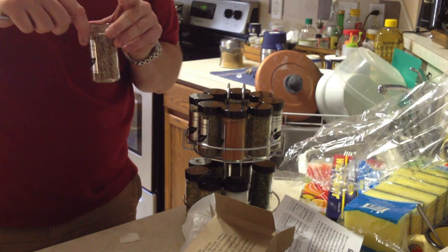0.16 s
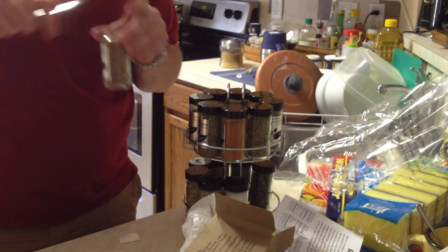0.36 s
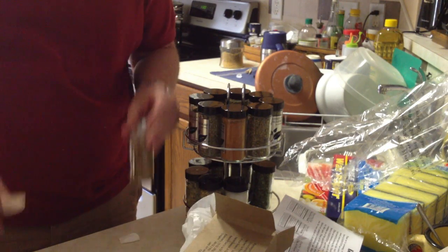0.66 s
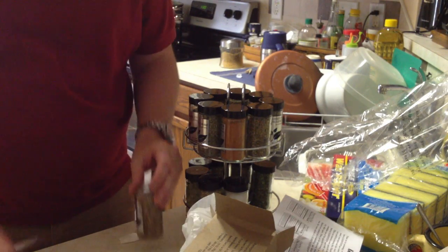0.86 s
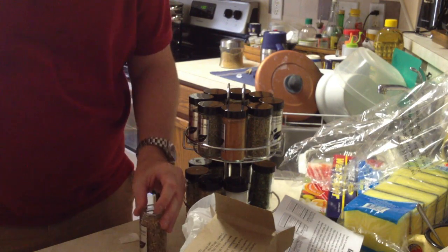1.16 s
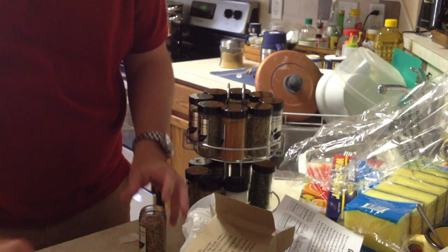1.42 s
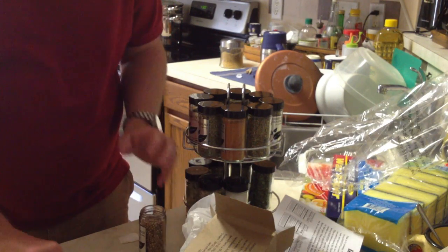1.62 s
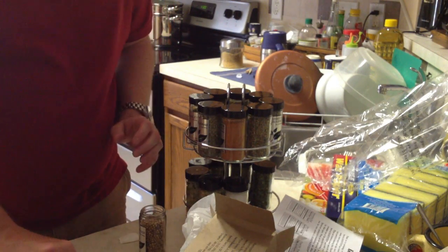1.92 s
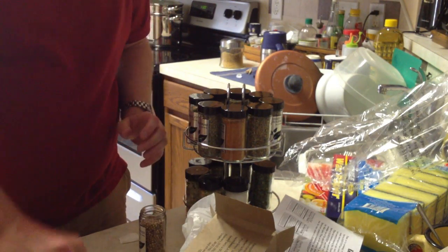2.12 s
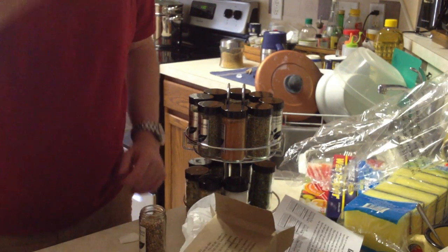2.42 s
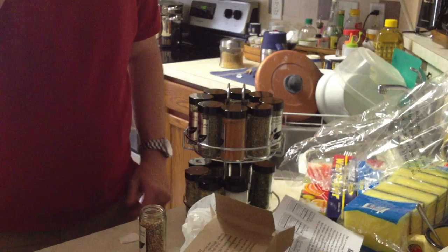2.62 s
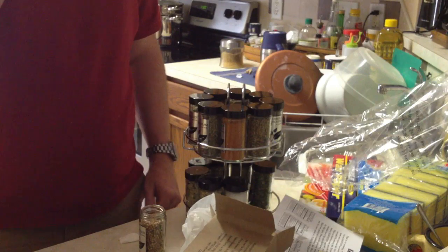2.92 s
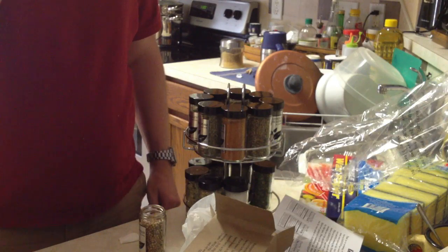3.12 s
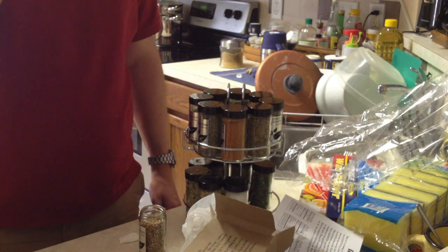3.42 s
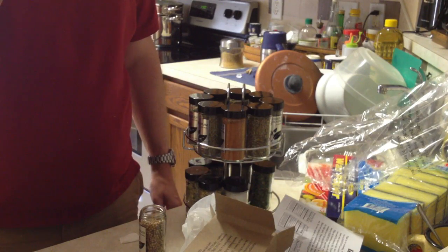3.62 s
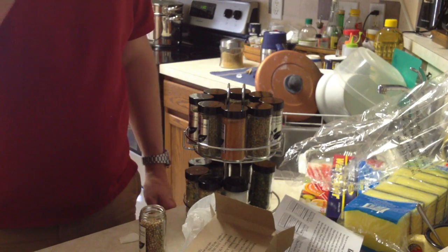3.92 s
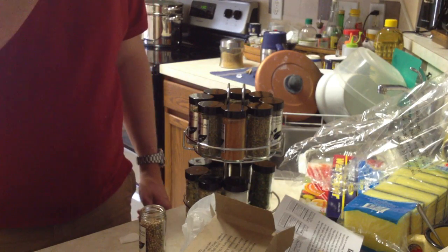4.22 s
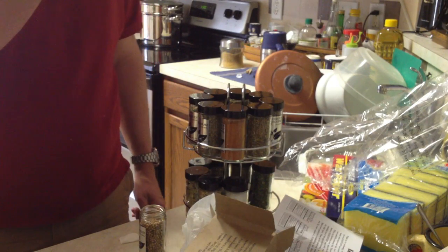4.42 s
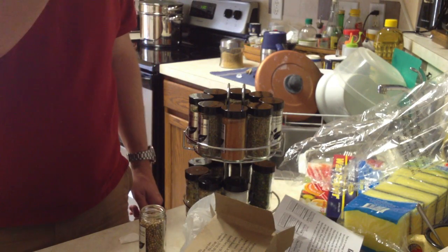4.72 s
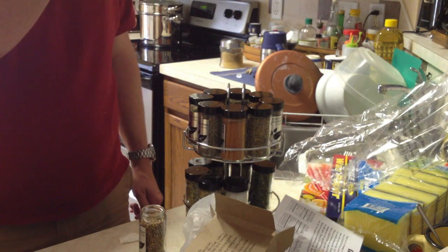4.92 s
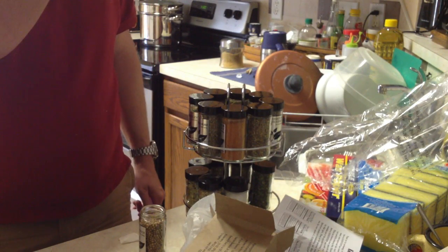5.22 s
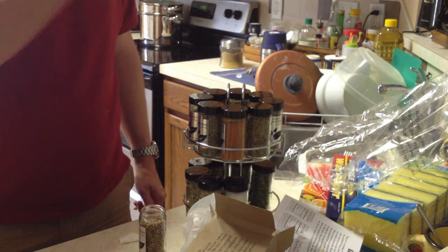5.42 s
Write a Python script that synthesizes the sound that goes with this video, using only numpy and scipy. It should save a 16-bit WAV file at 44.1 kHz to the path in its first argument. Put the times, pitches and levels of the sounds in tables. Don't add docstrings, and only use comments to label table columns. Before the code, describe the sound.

Close to a kitchen counter, a small camera microphone picks up faint ribbed clicks of a jar cap. A full glass jar then thuds down in a quick cluster of knocks, rocks, and clinks on other glass, leaving a high shimmering ring. After a pause, lids are tapped brightly and small dry ticks follow, over low refrigerator hum and hiss in a lively hard room.

```python
import sys
import numpy as np
from scipy import signal
from scipy.fft import rfft, irfft
from scipy.io import wavfile
from scipy.ndimage import uniform_filter1d

SR = 44100
rng = np.random.default_rng(int(sys.argv[2]) if len(sys.argv) > 2 else 0)


def unload_audio(sound):
    columns = np.transpose(np.atleast_2d(sound))
    steps = np.round(np.clip(columns, -1, 1) * 32767)
    wavfile.write(sys.argv[1], SR, steps.astype(np.int16))


def volts(x):
    e = np.asarray(x, float) / 20
    return 10 ** e


N = 245195
WALL_SHARE = 0.76


def evened(x):
    return x / np.sqrt(np.mean(x ** 2) + 1e-20)


def read(points, hz):
    f, value = np.transpose(points)
    return np.interp(np.log(hz + 1), np.log(f + 1), value)


def add(mix, s, sound):
    part = mix[round(s * SR):][:len(sound)]
    part += sound[:len(part)]


def ring(hz, t60, size=8000, rise=.00005):
    t = np.arange(size) / SR
    decay = volts(-60 * t / max(t60, 1e-4))
    onset = (1 - np.exp(-t / rise)) ** 2
    return decay * onset * np.sin(2 * np.pi * hz * t)


def causal(points, size=4096):
    log_gain = np.log(volts(read(points, abs(np.fft.fftfreq(size, 1 / SR)))))
    return np.fft.ifft(np.exp(np.conj(signal.hilbert(log_gain)))).real[:size // 2]


def kitchen():
    # line in Hz, level in dB rms
    hum_lines = [(60, -100.5), (100, -93.5), (120.5, -71), (198, -81), (240, -79.5), (296, -82),
                 (360, -83.5), (576, -99)]
    # frequency in Hz, hiss density in dB per Hz
    hiss_colour = [(30, -26), (60, -22.5), (95, -11), (170, 3), (320, -1.5), (660, -7), (1860, -9),
                   (3300, -11.5), (4500, -9), (5600, -13), (7700, -12), (10300, -20), (14400, -11),
                   (16000, -22)]
    t, hz = np.arange(N) / SR, np.fft.rfftfreq(N, 1 / SR)
    hiss = irfft(rfft(rng.standard_normal(N)) * volts(read(hiss_colour, hz)), N)
    out = volts(-69.5) * evened(hiss)
    for line_hz, db in hum_lines:
        sway = evened(uniform_filter1d(uniform_filter1d(rng.standard_normal(N), 5000), 5000))
        phase = 2 * np.pi * (line_hz * t + rng.random()) + 0.38 * sway[::-1]
        out += np.sqrt(2) * volts(db + 0.8 * sway) * np.sin(phase)
    return out


def tap(tick_hz, hollow_db, body_hz, body_t60, wall_db, edge_db, shift, upper):
    tick = ring(1.027 * tick_hz, 0.0023, size=2000, rise=0.0003)
    tick += 0.84 * ring(0.949 * tick_hz, 0.002, size=2000, rise=0.00028)
    body = ring(body_hz, body_t60, size=2000, rise=0.00014)
    body += 0.56 * ring(body_hz * upper, 0.71 * body_t60, size=2000, rise=0.00057)
    wall = ring(4050 * shift[0], 1.2 * body_t60, size=2000, rise=0.00024)
    wall += 0.64 * ring(4600 * shift[1], 0.82 * body_t60, size=2000, rise=0.0002)
    edge = ring(11800 * shift[2], 0.0024, size=2000, rise=0.00019)
    edge += 0.8 * ring(13400 * shift[3], 0.0024, size=2000, rise=0.00013)
    wall_gain = volts(WALL_SHARE * hollow_db + wall_db)
    return tick + volts(hollow_db - 1.5) * body + wall_gain * wall + volts(edge_db) * edge


def detuning():
    return 1 + .02 * rng.standard_normal(4)


def cap_turning():
    # start in seconds, peak in dB, tick in Hz, wall ring in dB
    clicks = [(0.2344, -41, 7500, -5.5), (.2444, -46, 8400, -9), (.2544, -57, 7600, -17),
              (.2942, -45, 8500, -6), (0.302, -54.5, 8200, -10.5), (0.3665, -43.5, 7700, -4),
              (.377, -50.5, 7840, -6), (0.3857, -50, 7500, -20), (.452, -61.5, 8000, 5),
              (0.497, -60.5, 8000, 2), (2.3042, -47.5, 7500, -5.5), (2.347, -55.5, 7600, 7)]
    out, body_db = np.zeros(N), -23
    for s, db, hz, ring_db in clicks:
        wall_db = ring_db - WALL_SHARE * body_db - 4.5
        click = tap(hz, body_db, 2500, 0.005, wall_db, -1, 1.07 * detuning(), 0.91)
        add(out, s, volts(db + 6.0) * click)
    return out


def dry_ticks():
    # start in seconds, peak in dB, tick in Hz, hollowness in dB
    touches = [(3.5948, -48.5, 8100, -22), (3.6004, -52.5, 8100, -21), (3.7885, -62, 8000, -4),
               (3.915, -52.5, 7800, -14.5), (3.9385, -43.5, 8160, -11.5), (3.944, -52, 7700, -12.5),
               (3.9765, -55, 8050, -2), (4.2898, -45, 7470, -20), (4.2962, -47, 7250, -17.5),
               (4.3455, -57, 8300, -20), (4.3581, -29.5, 8260, -11), (4.3636, -53, 8600, -10.5),
               (4.5673, -50.5, 8000, -22), (4.9795, -46, 7050, -31), (5.2565, -46.5, 9000, -27.5),
               (5.446, -60, 7960, -6.5)]
    out = np.zeros(N)
    for s, db, hz, hollow_db in touches:
        add(out, s, volts(db + 9.5) * tap(hz, hollow_db, 2150, .003, -7, -16, detuning(), 0.93))
    return out


def lid_taps():
    # start in seconds, tick peak in dB, hollowness in dB, body in Hz, edge in dB
    hits = [
        (3.1774, -34, -11.5, 1980, -25),
        (3.1806, -38.5, -10, 1780, -13.5),
        (3.1848, -23, -22.5, 1720, -5),
        (3.188, -25.5, -27.5, 1740, -10),
        (3.195, -51, -3, 1690, -5),
        (3.436, -31.5, -11, 1644, -14),
        (3.4386, -40.5, -5, 2040, -12),
        (3.4408, -45, -14, 1600, -13),
        (3.5587, -59.5, 6.5, 2390, -8),
    ]
    out = np.zeros(N)
    for s, db, hollow_db, hz, edge_db in hits:
        add(out, s, volts(db + 5.5) * tap(8400, hollow_db, hz, 0.011, -4.5, edge_db, detuning(), 1.24))
    return out


def rustle():
    # start in seconds, level in dB, hold in seconds, dull part in dB, fine fizz in dB
    jolts = [
        (0.884, -55, .015, 1, -27),
        (0.899, -50, 0.0083, 4.5, -13.5),
        (1.064, -49.5, 0.0092, 2.5, -14.5),
        (1.105, -59.5, .05, -5, -17),
        (1.334, -35.5, 0.0041, -7.5, -10),
        (1.348, -49.5, 0.098, 0, -38),
        (1.435, -48, .01, -12, -36),
        (2.33, -71, 0.011, 0.5, -14),
        (2.623, -78.5, 0.082, 5.5, -14),
        (3.928, -69, 0.04, -7, -18.5),
    ]
    t, out = np.arange(N) / SR, np.zeros(N)
    rise_db_per_s, settle_db_per_s = 2498.5, 222
    sizes = volts(4.2 * np.minimum(rng.exponential(1, (3, N)), 4))
    struck = rng.random((3, N)) < 4000 / SR
    grains = sizes * struck * rng.choice([-1, 1], (3, N))
    bright_ring = ring(7400, .001, size=300, rise=.0001)
    dull_ring = ring(4200, .0011, size=300, rise=.0001)
    fizz_ring = ring(11500, .0008, size=300)
    shapes = bright_ring, dull_ring, fizz_ring
    bright, dull, fizz = (evened(signal.oaconvolve(g, shape)[:N]) for g, shape in zip(grains, shapes))
    for s, db, hold_s, dull_db, fizz_db in jolts:
        rise_db = rise_db_per_s * np.maximum(s - t, 0)
        settle_db = settle_db_per_s * np.maximum(t - s - hold_s, 0)
        texture = bright + volts(dull_db) * dull + volts(fizz_db + 7.0) * fizz
        out += volts(db - rise_db - settle_db - 3.5) * texture
    return out


def knocks():
    # start in seconds, peak in dB, pulse in Hz (higher is harder)
    landings = [(.8751, -46, 399.4), (.885, -50.5, 493.5), (.903, -15, 1499), (.904, -28, 630),
                (.9089, -20, 1880), (.9168, -23, 1110), (.9238, -26, 775), (.938, -19.5, 1400),
                (.948, -23.5, 1100), (.9905, -25, 1190), (1.0055, -23.5, 1560), (1.022, -34, 880),
                (1.0653, -13, 940), (1.0749, -22, 680), (1.0812, -27, 790), (1.092, -29, 910),
                (1.127, -27.5, 910), (1.143, -32.5, 1150), (1.3185, -35, 800), (1.325, -33.5, 910),
                (1.3325, -16.5, 2290), (1.3341, -23, 590), (1.3464, -20.5, 1470), (1.379, -26, 890),
                (1.385, -18, 1190), (1.394, -32.5, 815), (1.41, -26, 1030), (1.428, -34.5, 930)]
    # start in seconds, peak in dB
    set_downs = [
        (2.649, -61),
        (3.178, -58),
        (3.4355, -56),
        (3.558, -58),
        (3.96, -58),
        (4.359, -55.5),
        (4.924, -60.5),
    ]
    # mode in Hz, level in dB, t60 in seconds
    counter = [(126.3, -8, 0.3), (215, -18.5, 0.1), (274, -2.5, 0.077), (374, 9.5, 0.077),
               (454, 4.5, 0.012), (550, 6.5, 0.025), (623, 4, 0.013), (745, -0.5, 0.065), (861, 1.5, 0.048),
               (941, -1, 0.043), (1080, 4.5, 0.029), (1286, -1, 0.0247), (1490, 0.5, 0.021),
               (1806, 7, 0.027), (2074, -2.5, 0.058), (2640, -10, 0.038), (3370, -13.5, 0.055),
               (4640, -27, 0.027)]
    out = np.zeros(N)
    modes = np.array([volts(db) * ring(hz, t60) for hz, db, t60 in counter])
    rows = landings + [(s, db, 755) for s, db in set_downs]
    for s, db, hz in rows:
        luck = rng.standard_normal(len(counter) + 1)
        u = np.pi * hz * (np.arange(200) / SR - .0012)
        force = np.exp(-u ** 2)
        pulse = np.sign(luck[-1]) * (1 - 2 * u ** 2) * force
        panel = signal.oaconvolve(volts(1.8 * luck[:-1]) @ modes, pulse + .3 * force)
        sound = volts(-4.5) * panel / abs(panel).max()
        add(sound, 0, 0.83 * pulse)
        add(out, s, volts(db - 0.5) * sound)
    return out


def bumps():
    # start in seconds, peak in dB, ring in Hz
    contacts = [
        (0.9911, -29, 2390),
        (1.2414, -34.5, 2160),
        (1.333, -20.5, 3100),
        (1.3366, -31, 2400),
        (1.3815, -29.5, 3240),
        (1.386, -18.5, 2653),
        (1.3874, -19, 1764),
        (1.4111, -35, 2570),
        (1.416, -29.5, 1990),
        (1.427, -25.5, 1780),
    ]
    out, t60 = np.zeros(N), 0.009
    for s, db, hz in contacts:
        low = ring(hz, t60, size=2000, rise=0.00011)
        high = ring(1.28 * hz, 0.67 * t60, size=2000, rise=0.000208)
        add(out, s, volts(db) * (low + 0.59 * high))
    return out


def cracks(clinks):
    out = np.zeros(N)
    for s, db, place in clinks:
        hz = 7200 * (1 + .06 * rng.standard_normal())
        add(out, s, volts(db + 6.0) * ring(hz, .004, size=300, rise=.00015))
    return out


def glass(clinks):
    mode_hz = [1575, 1650, 1727, 1800, 2525, 3415, 3778.3, 3782, 4975, 5240, 6146.8, 6638, 6940, 7990,
               8590.8, 8594, 9459, 9972, 10765, 11841, 12279, 12326, 12630, 14263, 14861, 14936]
    # dB rms at the last clink, t60 in
    # seconds, extra dB when struck at the rim, pair split in Hz, seconds of one beat dip, partner share
    wall_modes = [(-54, 0.73, 9, 17, 3.5, .6), (-56, 0.96, -1, 8.5, 2.7, 0.66),
                  (-45.5, .65, 2.5, -15.5, 1.47, 0.44), (-60, 0.4, 5, 16, 1.47, 0.77),
                  (-63, .5, -25, 4, 1.5, 0.17), (-57.5, 0.99, -46, -12, 1.8, 0.61),
                  (-67.5, 6, 0, 1.55, 2.24, .38), (-58, 1.1, 0, -10.5, 1.47, 0.55),
                  (-56, 0.65, -2, -17.5, 1.47, 1), (-66, 0.31, -12.5, 5.5, 0.95, 0.35),
                  (-60.5, 1.6, 0, 4.5, 2.8, 0.67), (-51, 0.56, -2, 15, 1.5, 1),
                  (-70.5, 0.31, -3, -29.5, 1.2, .6), (-44, 0.38, 1, 13, 1.41, 1),
                  (-56.5, 2.25, 22, 2.5, 1.942, 1), (-40, 0.47, 25, -9.5, 1.8, 0.55),
                  (-53.5, 0.82, 0, 9, 1.98, .3), (-51, 0.45, -8.5, 14, 1.2, 0.97),
                  (-51.5, 0.54, -2, -11, 1.37, 0.56), (-100, 0.12, 20, 22, 1.4, .6),
                  (-43.5, 0.31, 2.5, 21, 0.76, 0.69), (-43.5, 0.15, -1, 9, 0.92, 0.65),
                  (-64, .27, 0, -2, 1.4, .6), (-57, 0.3, -3.5, -10.5, 1.5, .5),
                  (-55.5, .33, -1, 11.5, 1.385, .4), (-56, .33, 5, 12, 1.385, .4)]
    out, (s, blow_db, place) = np.zeros(N), np.transpose(clinks)
    t = np.arange(SR, 4 * SR) / SR
    at = (s * SR).astype(int) - SR
    for hz, (db, t60, rim_db, split_hz, dip_s, share) in zip(mode_hz, wall_modes):
        energy = np.zeros(len(t))
        energy[at] = volts(blow_db + rim_db * (2 * place + 2.5)) ** 2
        energy = signal.lfilter([1], [1, -volts(-120 / t60 / SR)], energy)
        swell = abs(uniform_filter1d(energy, size=20)) / energy[at[-1]]
        level = volts(db + 1.5 * np.log2(hz / 4000))
        size = level * np.sqrt(swell * 2 / (1 + share ** 2))
        turn = 2 * np.pi * (hz * t + rng.random())
        partner = np.sin(turn - 2 * np.pi * split_hz * (t - dip_s))
        add(out, 1, size * (np.sin(turn) - share * partner))
    return out


def room(x):
    # frequency in Hz, t60 in seconds
    decay = [(120, 0.811), (300, 0.65), (800, 0.63), (2000, 0.58), (5000, 0.68), (9000, 0.4), (14000, 0.52)]
    # delay in ms, level in dB
    echoes = [(2.1, -20), (5.6, -6.5), (10.2, -18.5), (14, -33), (19.5, -34), (26, -16)]
    spikes = np.zeros(SR)
    at = np.arange(200, SR - 20, 16)
    spikes[at + rng.integers(0, 16, at.shape)] = rng.choice([-1., 1.], at.shape)
    hz, t, z = signal.stft(spikes, SR, nperseg=256)
    swell = 1 - np.exp(-t / 0.0023)
    fade = volts(-60 * t / read(decay, hz)[:, None])
    tail = signal.istft(z * swell * fade, SR, nperseg=256)[1]
    tail = volts(-2.5) * tail / np.linalg.norm(tail)
    for k, (ms, db) in enumerate(echoes):
        add(tail, ms / 1000, np.array([(-1) ** k * volts(db)]))
    return signal.fftconvolve(x, tail)[:N]


def microphone(x):
    # frequency in Hz, gain in dB
    colour = [(60, -40.5), (150, 2), (1000, 3), (3000, 2.5), (4500, 0), (5200, -1.5), (5600, -8.5),
              (6000, 2), (6500, -1), (8500, 0.5), (10500, -1), (13000, -5.5), (15500, -11)]
    return signal.oaconvolve(x, causal(colour))[:N]


def scene():
    # start in seconds, peak in dB, place from 0 (base) to 1 (rim)
    clinks = [
        (1.335, -23.5, 0.43),
        (1.34, -30, .1),
        (1.357, -37, 0.37),
        (1.3795, -25, 0.54),
        (1.386, -47, 0.75),
        (1.409, -24, 0.97),
        (1.4275, -48, 0.84),
        (1.4405, -29, .8),
        (1.4472, -26.5, 1.0),
    ]
    handling = cap_turning() + dry_ticks() + lid_taps()
    blows = handling + rustle() + knocks() + bumps() + cracks(clinks)
    walls = volts(2.5) * glass(clinks)
    wet = room(blows + volts(-10.5) * walls)
    return (microphone(blows + wet) + walls + kitchen())[None]


def roll_off(x):
    return signal.sosfilt(signal.butter(12, 16460, fs=SR, output="sos"), x)


def record(dry):
    low_pass = signal.firwin(127, 15400, fs=SR)[None]
    mix = signal.oaconvolve(dry, low_pass, "same")
    return roll_off(mix)


dry = scene()
out = record(dry)
unload_audio(out)
```